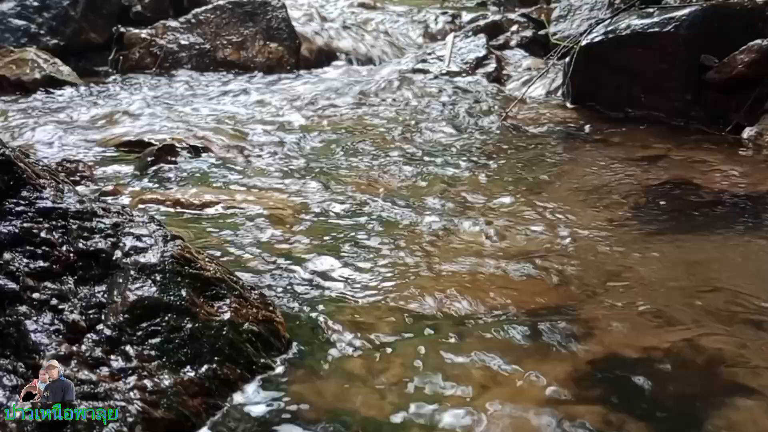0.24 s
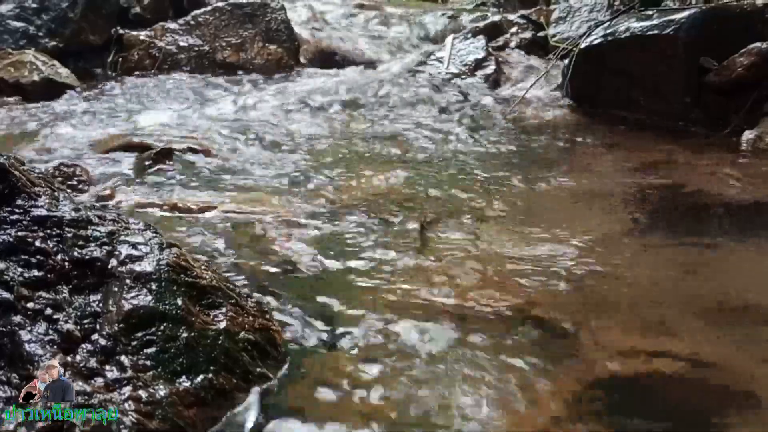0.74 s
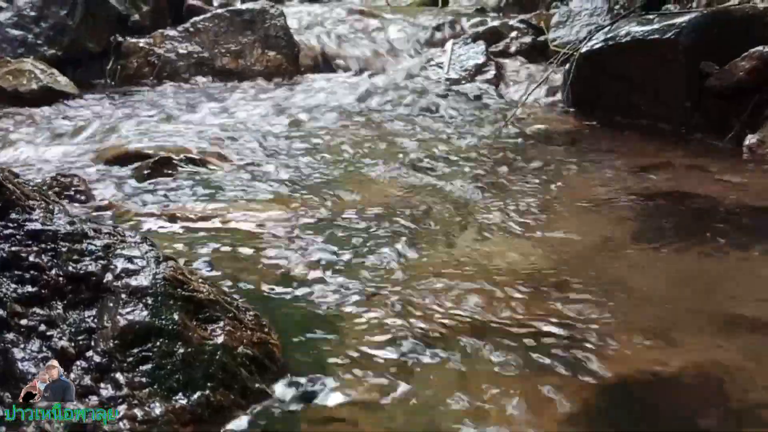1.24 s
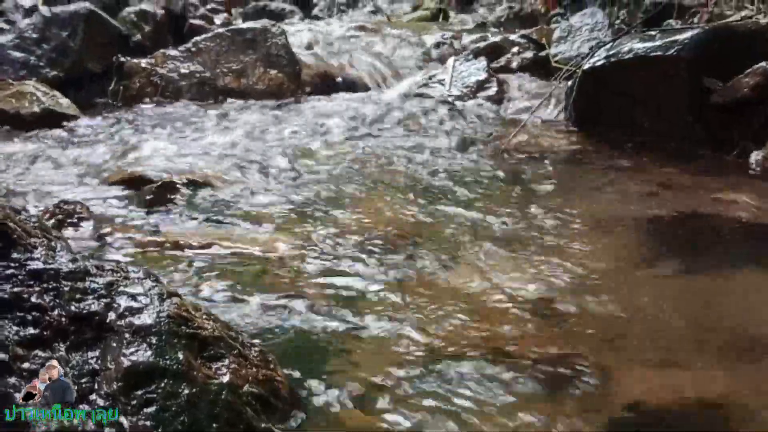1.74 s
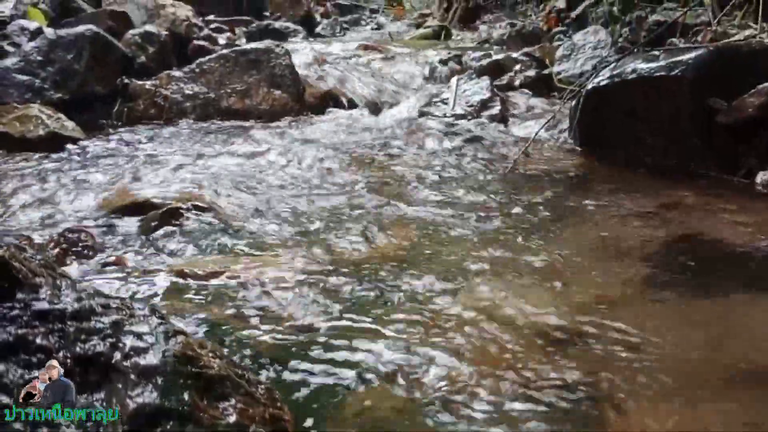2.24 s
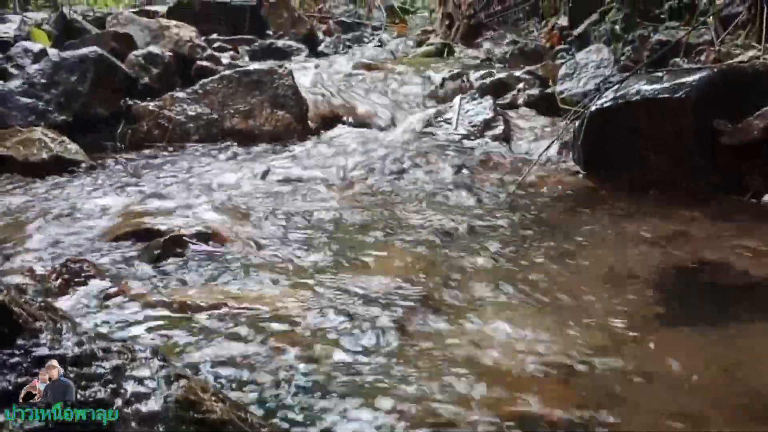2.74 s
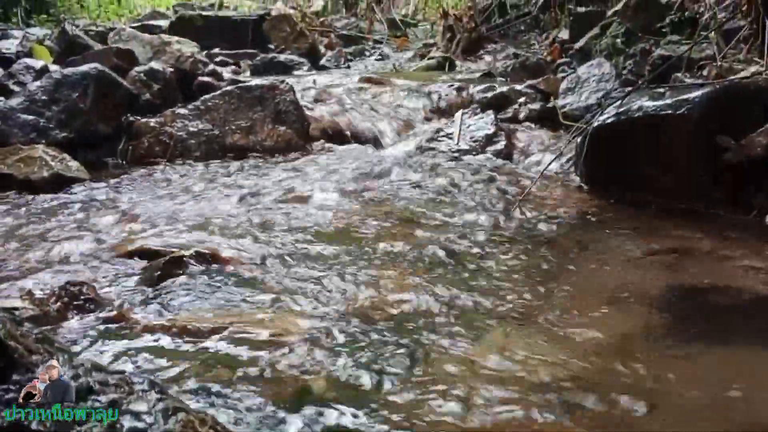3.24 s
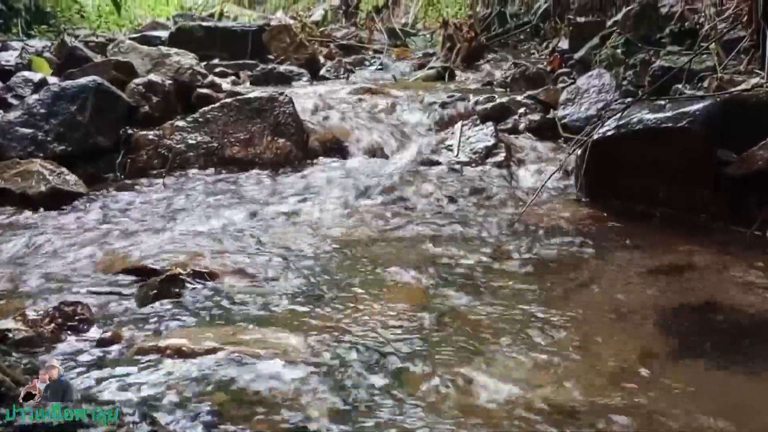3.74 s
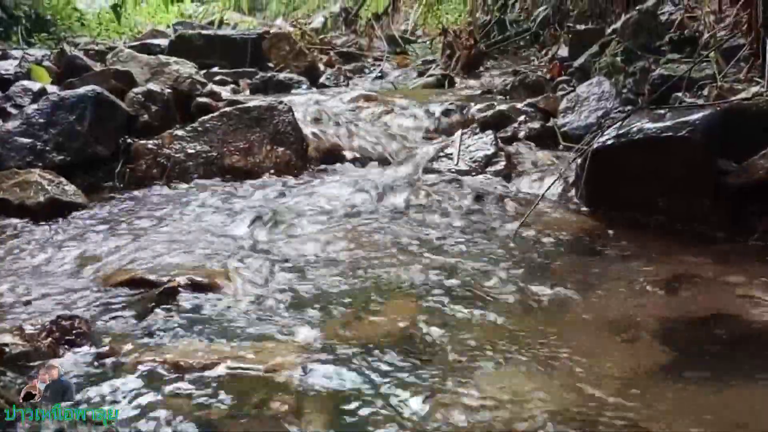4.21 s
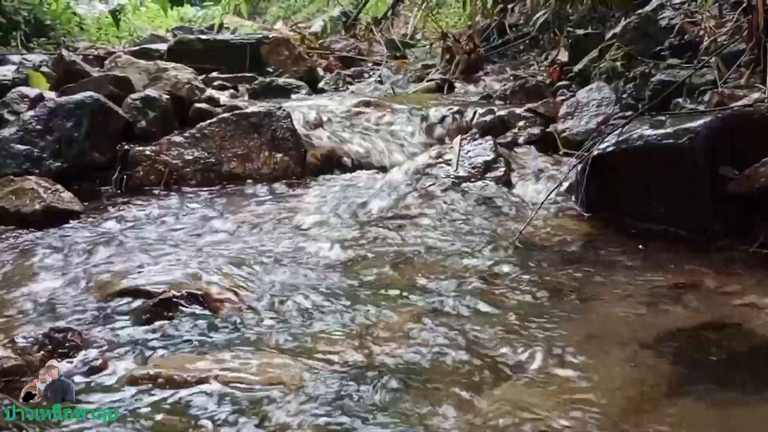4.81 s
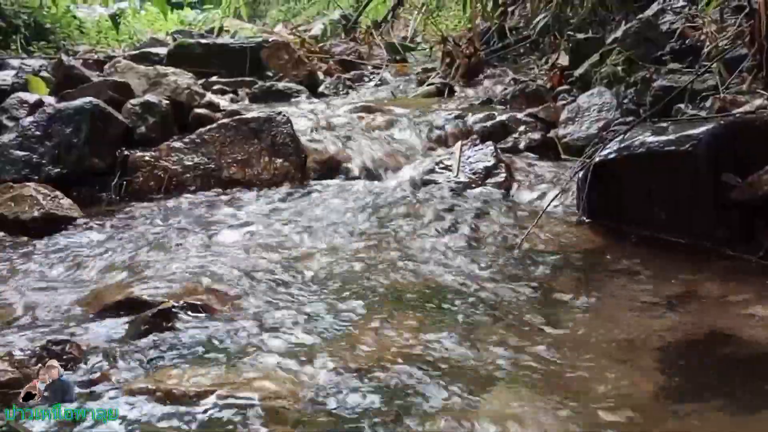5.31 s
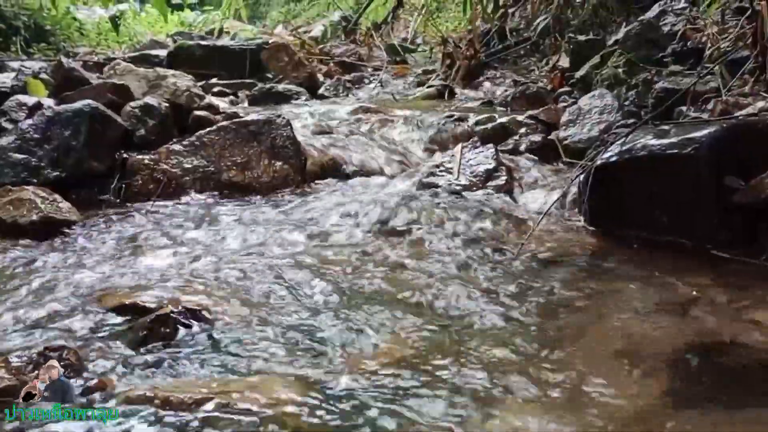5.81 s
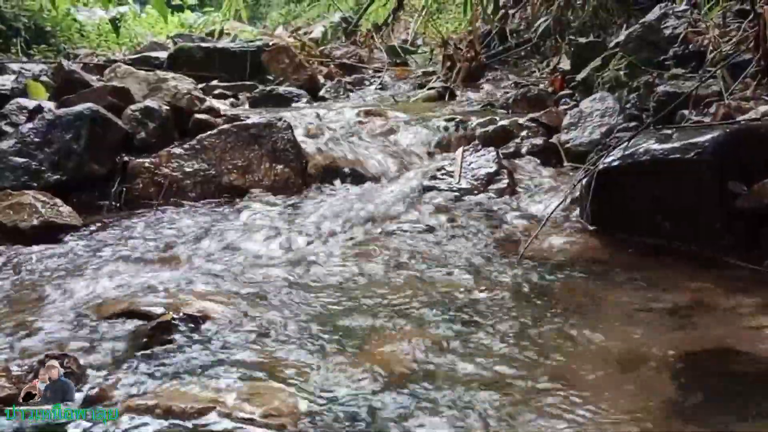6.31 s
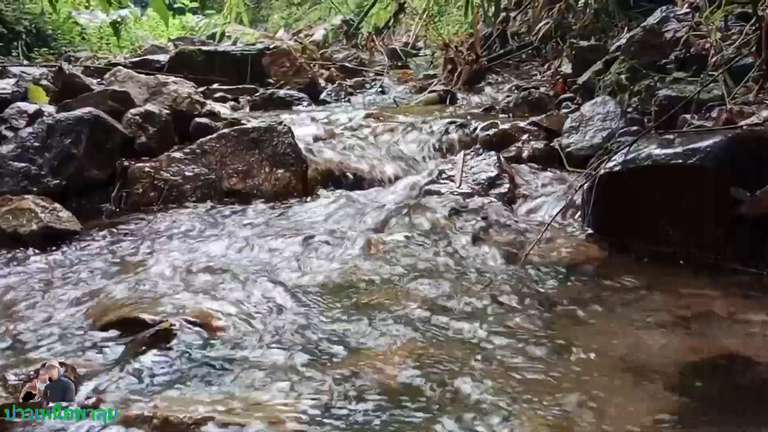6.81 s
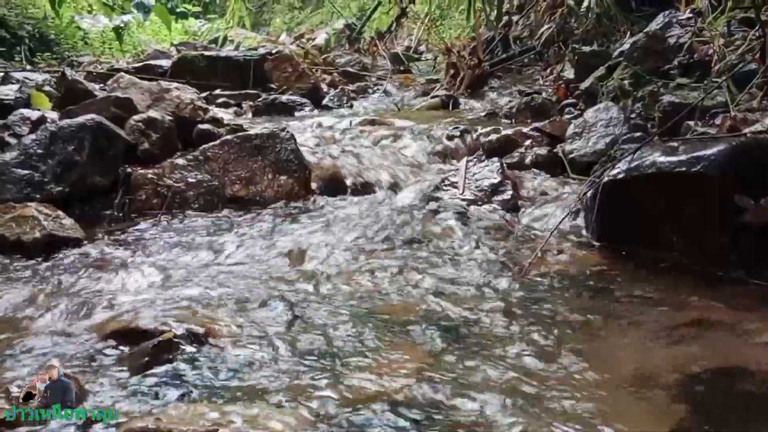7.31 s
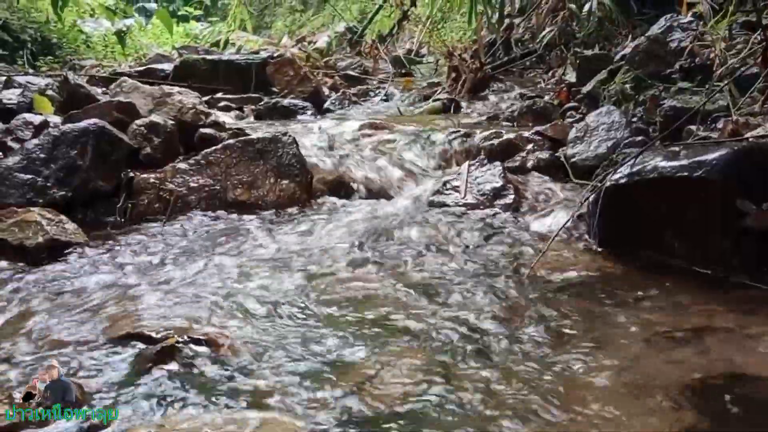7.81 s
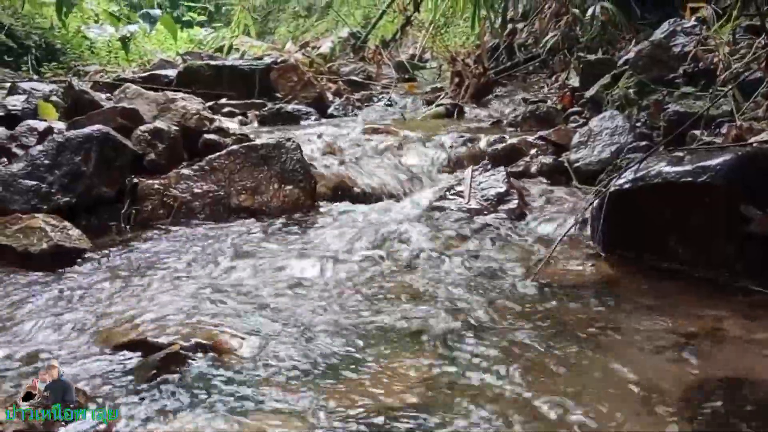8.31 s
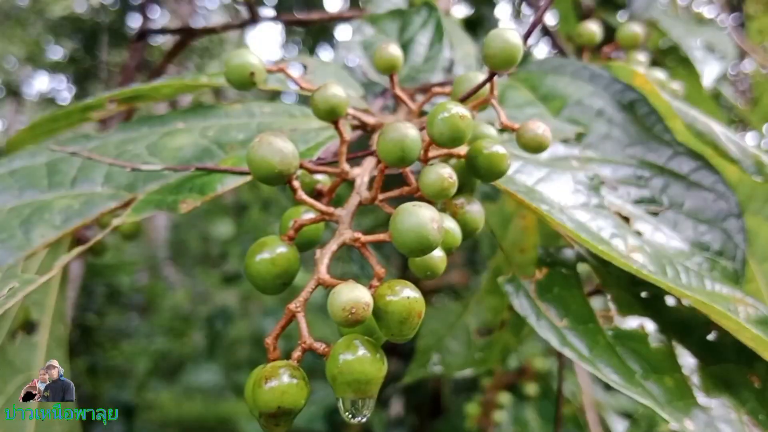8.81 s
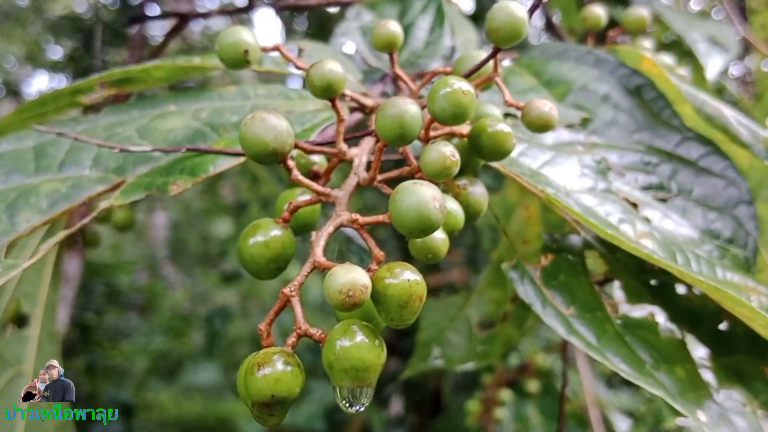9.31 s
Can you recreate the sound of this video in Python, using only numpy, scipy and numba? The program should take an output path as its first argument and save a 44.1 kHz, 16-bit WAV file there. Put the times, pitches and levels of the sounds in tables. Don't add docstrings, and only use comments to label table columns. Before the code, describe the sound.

A shallow forest stream rushes and bubbles over rocks close by, with splashy ticks and gurgles, between brief, very faint moments of insect hum.

```python
import sys
import numpy as np
from scipy import signal
from scipy.fft import rfft, irfft
from scipy.io import wavfile
from scipy.ndimage import uniform_filter1d
from numba import njit

SR = 44100
rng = np.random.default_rng(int(sys.argv[2]) if len(sys.argv) > 2 else 0)


def gain_from_decibels(decibels):
    exponent = np.asarray(decibels, float) / 20
    return 10 ** exponent


def digitize_waveform(pressure):
    field = np.atleast_2d(pressure).T
    bounded = np.clip(field, -1, 1)
    quanta = np.round(bounded * 32767).astype(np.int16)
    wavfile.write(sys.argv[1], SR, quanta)


N = 421155

# start_s, peak_db, centre_hz
DROP_TICKS = [(0.751, -11.5, 8100), (1.3165, -11, 8470), (1.851, -6, 7980), (2.17, -18.5, 7700),
              (2.252, -12.5, 7430), (2.5377, -15, 8320), (3.073, -14.5, 8900), (3.2903, -16.5, 7270),
              (3.502, -13.5, 8260), (3.7903, -12, 6840), (3.9574, -13, 8490), (4.597, -15, 7020),
              (4.6374, -16, 8280), (4.853, -8.5, 8550), (4.9186, -11.5, 8300), (5.4854, -17, 8580),
              (5.6347, -12.5, 7230), (5.7347, -8, 8500), (5.893, -15, 8720), (5.961, -14, 8650),
              (6.0354, -15, 9670), (6.486, -11.5, 7790), (6.892, -11.5, 7990), (7.0373, -17.5, 5510),
              (7.4384, -16.5, 8650), (7.6214, -12.5, 7640), (7.723, -15, 6960), (7.9205, -14.5, 7300),
              (8.1317, -15, 7840)]
NOTCH_EDGES_HZ = (4660, 4990)


def rms_one(x):
    return x / np.sqrt(np.mean(x ** 2) + 1e-20)


def in_time(rows):
    s, db = np.transpose(rows)
    return np.interp(np.arange(N) / SR, s, db)


def ramp(start_s, length_s):
    return np.clip((np.arange(N) / SR - start_s) / length_s, 0, 1)


def drift(rate):
    r = np.exp(-80 * np.pi * rate / SR)
    noise = rng.standard_normal(N // 40 + 2002)
    slow = signal.lfilter([1], [1, -2 * r, r * r], noise)[2000:]
    return np.interp(np.arange(N) / 40, np.arange(len(slow)), rms_one(slow - slow.mean()))


def colour(x, spectrum):
    hz, db = np.transpose(spectrum)
    grid = np.fft.rfftfreq(8192, 1 / SR)
    gain = gain_from_decibels(np.interp(np.log(grid + 1), np.log(hz), db))
    cepstrum = irfft(np.log(gain))
    cepstrum[1:4096] *= 2
    cepstrum[4097:] = 0
    response = irfft(np.exp(rfft(cepstrum)))
    return rms_one(signal.fftconvolve(x, response)[:N])


def resonance(x, hz, width_hz):
    r = np.exp(-np.pi * width_hz / SR)
    poles = [1, -2 * r * np.cos(2 * np.pi * hz / SR), r * r]
    return signal.lfilter([(1 - r * r) / 2, 0, (r * r - 1) / 2], poles, x)


@njit
def ring(out, seconds, heights, pitches, cycles, rises, onset, sr):
    for k in range(len(seconds)):
        start, length, phase = int(seconds[k] * sr), int(cycles[k] * sr / pitches[k]), 0.
        for i in range(min(length, len(out) - start)):
            age = i / length
            phase += 2 * np.pi * pitches[k] * (1 + rises[k] * age) / sr
            envelope = np.exp(-6.9 * age) * (1 - np.exp(-age * cycles[k] / onset))
            out[start + i] += heights[k] * np.sin(phase) * envelope
    return out


def swarm(low_hz, high_hz, cycles, spread_db, rise, tilt, count):
    when, size, loud, life, sign = rng.random((count, 5)).T
    hz = low_hz * (high_hz / low_hz) ** size
    loudness = gain_from_decibels(spread_db * np.minimum(-np.log(loud), 4))
    heights = hz ** tilt * loudness * np.sign(sign - .5)
    return rms_one(ring(np.zeros(N), when * N / SR, heights, hz, cycles * (.5 + life), rise * life, .8, SR))


def singles(rows, cycles, rise, onset, trim_db):
    s, db, hz = np.transpose(rows)[:3]
    return ring(np.zeros(N), s, gain_from_decibels(db + trim_db), hz, cycles + 0 * s, rise + 0 * s, onset, SR)


def insect_chorus():
    # pitch_hz, width_hz, level_db
    buzz_bands = [(6400, 90, -29), (6600, 30, -5), (6690, 280, 6), (6930, 120, 6), (7800, 120, -22)]
    buzz = rng.standard_normal((len(buzz_bands), N)) * gain_from_decibels(1.3 * drift(60.))
    chorus = np.zeros(N)
    for noise, (hz, width_hz, db) in zip(buzz, buzz_bands):
        band = resonance(resonance(noise, hz, width_hz), hz, width_hz)
        chorus += gain_from_decibels(db) * rms_one(band)
    return rms_one(chorus)


def cricket():
    pitch_hz, pulses_per_s = 5188, 69
    t = np.arange(N) / SR
    pulses = 1 + 0.52 * np.sin(2 * np.pi * pulses_per_s * t + .8 * drift(6.))
    tone = np.sin(2 * np.pi * pitch_hz * t + 0.78 * drift(12.))
    return rms_one(pulses * gain_from_decibels(1.5 * drift(9.)) * tone)


def forest_air():
    # frequency_hz, level_db (per Hz)
    air_spectrum = [(40, -12), (150, -2), (700, -13.5), (1400, -6), (2300, -3.5), (3800, -20.5),
                    (5600, -24.5), (8000, -0.5), (9300, -13), (10200, -5.5), (11500, -18.5), (15800, -26)]
    return gain_from_decibels(3.0) * colour(rng.standard_normal(N), air_spectrum)


def dull_knock():
    # start_s, peak_db, pitch_hz, ring_cycles
    knock_modes = [(9.196, -65.5, 470, 13), (9.207, -57, 176, 10), (9.208, -62, 350, 14),
                   (9.225, -67, 480, 20), (9.236, -70, 400, 18), (9.243, -68, 320, 14), (9.25, -65, 200, 12),
                   (9.258, -70, 516, 18), (9.29, -69, 320, 10), (9.078, -82, 870, 60)]
    return singles(knock_modes, np.transpose(knock_modes)[3], 0.018, .8, trim_db=8.0)


def forest():
    # middle_s, chorus_db, cricket_db, air_db, cricket_swell_db_per_s
    passages = [
        (.15, -61.5, -71.5, -66, -10.),
        (9.25, -69, -88, -84, 18.),
    ]
    t = np.arange(N) / SR
    chorus, chirp, air = insect_chorus(), cricket(), forest_air()
    fade_out = (1 - ramp(.27, .302 - .27)) * (t < .296)
    fade_in = ramp(8.83, 8.99 - 8.83) ** 1.3
    out = dull_knock()
    for fade, (middle, chorus_db, cricket_db, air_db, swell) in zip((fade_out, fade_in), passages):
        chirp_gain = gain_from_decibels(cricket_db + swell * np.clip(t - middle, -1, 1))
        out += fade * (gain_from_decibels(chorus_db) * chorus + chirp_gain * chirp + gain_from_decibels(air_db) * air)
    return out


def surge(fast_db, slow_db, shared):
    return gain_from_decibels(fast_db * drift(49.0) + slow_db * shared)


def splashes(per_s, spread_db, decay_s, typed_db):
    landing, loud = rng.random((2, N))
    jumps = (landing < per_s / SR) * gain_from_decibels(spread_db * np.minimum(-np.log(loud), 3))
    s, db = np.transpose(DROP_TICKS)[:2]
    jumps[(s * SR).astype(int)] += gain_from_decibels(db + typed_db)
    return 1 + signal.lfilter([1], [1, -np.exp(-1 / (decay_s * SR))], jumps + 1e-18)


def deep_bed():
    # frequency_hz, level_db (per Hz)
    deep_spectrum = [(18, -47.5), (30, -17), (48, -29), (65, -28), (140, 3.5), (269, 1), (360, -11.5),
                     (470, -45), (790, -120)]
    low = swarm(60, 420, 25.0, 3.7, 0.13, tilt=1, count=500) + gain_from_decibels(-8.0) * rng.standard_normal(N)
    return gain_from_decibels(-33.0) * colour(low * surge(0.95, 1.0, drift(1.4)), deep_spectrum)


def spray_bed(splash, shared):
    # frequency_hz, level_db (per Hz)
    spray_spectrum = [(2880, -63), (4900, -45), (5220, -19), (5480, -12), (5990, -13), (7070, -1.5),
                      (8390, 0.5), (9480, -5.5), (11400, -10.5), (14900, -12.5), (15800, -6.5)]
    top = swarm(4500, 15860, 24., 4.3, 0.11, tilt=1, count=20000)
    top += gain_from_decibels(6.0) * rms_one(rng.standard_normal(N) * splash)
    return gain_from_decibels(3.0) * colour(top * surge(0.74, .6, shared), spray_spectrum)


def bubbling_bed(splash, shared):
    # frequency_hz, level_db (per Hz)
    bubbling_spectrum = [(180, -28.5), (300, -33.5), (344, -22), (386, -17.5), (595, 1.5), (699, -4),
                         (801, 3), (929, -1.5), (1220, 4.5), (1370, 1.5), (2430, -2), (4200, -24.5),
                         (4600, -34), (5980, -76), (10100, -120)]
    mid = swarm(250, 5000, 42., 2.3, .06, tilt=.5, count=8000)
    rapids = signal.lfilter([1, -1], [1, -.9], rng.standard_normal(N) * 1.0)
    mid += gain_from_decibels(6) * rms_one(rapids * splash ** .3)
    bed = gain_from_decibels(1.0) * colour(mid * surge(0.73, 1.23, shared), bubbling_spectrum)
    bed += gain_from_decibels(-21) * swarm(1050, 1340, 38.0, 4.2, 0.027, tilt=0, count=70)
    bed += gain_from_decibels(-16.5) * swarm(1700, 4600, 65.0, 1.2, 0.061, tilt=-2.2, count=500)
    return bed


def air_pockets():
    # start_s, peak_db, pitch_hz
    deep_glugs = [(0.559, -37.5, 180), (1.807, -37, 211), (2.328, -37, 149), (2.617, -44.5, 252),
                  (2.943, -39, 146), (3.058, -33.5, 226.6), (4.816, -38, 233), (5.001, -47.5, 242),
                  (5.351, -35.5, 281), (5.5, -28, 253), (5.648, -41, 180), (6.165, -32.5, 237),
                  (6.378, -35, 228), (6.54, -36, 219), (7.021, -33, 207.8), (8.304, -33.5, 222.4)]
    # start_s, peak_db, pitch_hz
    mid_gurgles = [(0.978, -15, 442), (1.082, -16, 415), (1.159, -21.5, 350), (1.252, -21, 392),
                   (1.549, -20.5, 360), (1.806, -23, 338), (2.198, -19, 379), (2.601, -21.5, 396),
                   (3.201, -24.5, 322), (3.799, -22.5, 405), (4.383, -22.5, 427), (4.418, -27, 361),
                   (5.651, -23.5, 345), (5.911, -19, 430), (6.813, -24, 392)]
    rises = rng.uniform(-.3, 0.33, len(deep_glugs))
    return singles(deep_glugs, 40., rises, 12., trim_db=10.) + singles(mid_gurgles, 35.0, 0.093, 13.0, trim_db=8.0)


def clear_bubbles():
    # start_s, peak_db, pitch_hz
    small_plops = [(0.904, -8, 1257), (1.052, -6.5, 2020), (1.133, -5.5, 1210), (1.235, -4.5, 1120),
                   (1.287, -7.5, 1260), (1.419, -9, 1220), (1.534, -1, 1182), (1.728, -7, 1156),
                   (1.994, -11.5, 1270), (2.411, -7, 1530), (2.654, -6.5, 1230), (2.771, -4.5, 1530),
                   (3.169, -2.5, 1290), (3.212, -6.5, 1075), (3.534, -11.5, 1800), (3.672, -4, 1170),
                   (4.41, -10, 1700), (4.822, -5, 1185), (5.127, -7.5, 1950), (5.35, -5, 1300),
                   (5.601, -8.5, 1530), (5.656, -1, 1580), (6.239, -4.5, 1870), (7.401, -7, 1900),
                   (7.807, -11.5, 1570), (7.917, -9, 2420), (8.216, -8, 1070), (8.324, -4, 1950),
                   (8.44, -4.5, 1570), (8.596, -2, 1210)]
    # start_s, peak_db, pitch_hz
    large_blobs = [(.453, -7, 1080), (1.638, -13, 1263), (4.594, -13.5, 1526), (2.43, -12, 480),
                   (3.215, -12, 600), (3.7, -15, 565), (8.531, -16.5, 642), (0.8, -10, 760),
                   (0.824, -9, 586), (1.018, -14, 776), (1.255, -4.5, 538), (1.309, -7, 740),
                   (1.776, -10, 805), (3.0, -16, 780), (3.764, -11.5, 514), (4.063, -10, 775),
                   (4.22, -13, 570), (4.715, -9.5, 602), (4.786, -9.5, 546), (4.852, -13, 642),
                   (5.475, -8, 793), (5.779, -8.5, 1050), (5.891, -8.5, 509), (6.033, -13.5, 517),
                   (7.429, -15, 632), (7.732, -14.5, 556), (8.171, -5, 595), (8.462, -7, 615)]
    return singles(small_plops, 34.0, 0.021, 1.8, trim_db=1.5) + singles(large_blobs, 30., .05, 2.5, trim_db=3.5)


def stream():
    # time_s, bubbling_db
    vigour = [(.52, -23.5), (.92, -20.5), (1.3, -22.5), (1.68, -24.5), (2.28, -24.5), (2.41, -21),
              (2.5, -26), (3.15, -24), (3.4, -26), (4.6, -25.5), (4.8, -23.5), (5.3, -25.5), (5.8, -24),
              (6.3, -26.5), (6.43, -23), (6.8, -26), (7.8, -24), (8.5, -24)]
    flow_db = in_time(vigour)
    bubbling = gain_from_decibels(flow_db)
    spray = gain_from_decibels(-37.5 + 0.69 * (flow_db - flow_db.mean()))
    shared = 1.57 * np.tanh(drift(12.0) / 1.4)
    splash = splashes(45., 2.6, 0.0035, typed_db=21.5)
    bed = bubbling * (deep_bed() + bubbling_bed(splash, shared)) + spray * spray_bed(splash, shared)
    ticks = singles(DROP_TICKS, 30., 0.046, 0.74, trim_db=0.5)
    return bed + air_pockets() + ticks + clear_bubbles()


def notch_gate(x):
    hold_s, open_share = 0.067, .29
    spray = signal.sosfilt(signal.butter(2, 5200., "high", fs=SR, output="sos"), x) ** 2
    usual = uniform_filter1d(spray, size=SR // 2) ** 2
    burst = uniform_filter1d(spray ** 2, size=int(hold_s * SR)) / (usual + 1e-20)
    burst = burst * gain_from_decibels(3. * drift(4.))
    return uniform_filter1d(1. * (burst > np.quantile(burst, 1 - open_share)), size=500)


def flicker(x):
    strip_hz = 259
    hz, s, frames = signal.stft(x, SR, nperseg=1024)
    at = np.minimum((s * SR).astype(int), N - 1)
    gain = np.ones(frames.shape)
    for low in np.arange(3016, 6624, strip_hz):
        gain[(hz >= low) & (hz < low + strip_hz)] = gain_from_decibels(3 * drift(8.3)[at])
    for low, high in [(4480, 5300), (4990, 5180)]:
        gain[(hz >= low) & (hz < high)] *= drift(7.)[at] < .55
    return signal.istft(frames * gain, SR, nperseg=1024)[1][:N]


def shape_stream(water):
    # centre_hz, width_hz, depth_db
    weak_patches = [(352.4, 285, 4.5), (3650, 820, 2.5), (4170, 170, 5.5), (5110, 570, 6), (6370, 380, 2.5)]
    # centre_hz, width_hz, level_db
    treble_shape = [(8910, 460, 2.5), (9260, 500, -3.), (11460, 630, -2.5), (13900, 900, -5.),
                    (4260, 260, 1.5)]
    x = water
    for hz, width_hz, depth_db in weak_patches:
        x = x + (gain_from_decibels(depth_db * drift(16.2)) - 1) * resonance(x, hz, width_hz)
    for hz, width_hz, db in treble_shape:
        x = x + (gain_from_decibels(db) - 1) * resonance(x, hz, width_hz)
    x = x / (1 + np.abs(x / .51) ** 4) ** .25
    passing = notch_gate(x)
    notch_band = signal.butter(2, NOTCH_EDGES_HZ, "band", fs=SR, output="sos")
    leak = rms_one(signal.sosfilt(notch_band, rng.standard_normal(N)))
    x = signal.sosfilt(signal.cheby2(6, 50, NOTCH_EDGES_HZ, "bandstop", fs=SR, output="sos"), x)
    x = flicker(x) + gain_from_decibels(-70 + 3 * drift(20.)) * passing * leak
    x = signal.sosfilt(signal.butter(2, 60., "high", fs=SR, output="sos"), x)
    x = signal.sosfilt(signal.cheby2(14, 60, 15990, fs=SR, output="sos"), x)
    fade_in = ramp(.4115, 0.14) ** 1.26
    fade_out = (1 - ramp(8.621, 0.083)) * (np.arange(N) / SR < 8.6875)
    return x * fade_in * fade_out


def scene():
    return (shape_stream(stream()) + forest())[None]


def roll_off(x):
    return signal.sosfilt(signal.butter(12, 15910, fs=SR, output="sos"), x)


def record(dry):
    return roll_off(dry - 1.2e-4)


dry = scene()
out = record(dry)
digitize_waveform(out)
```